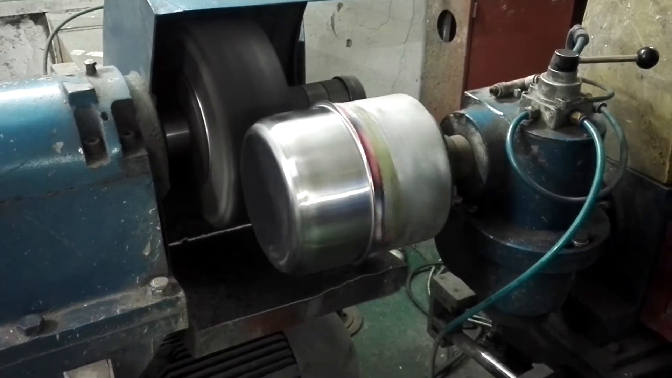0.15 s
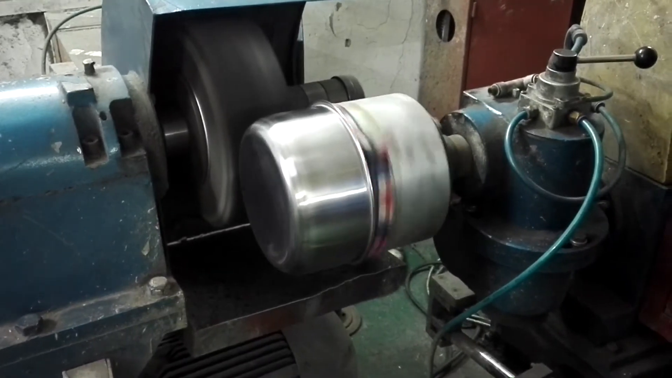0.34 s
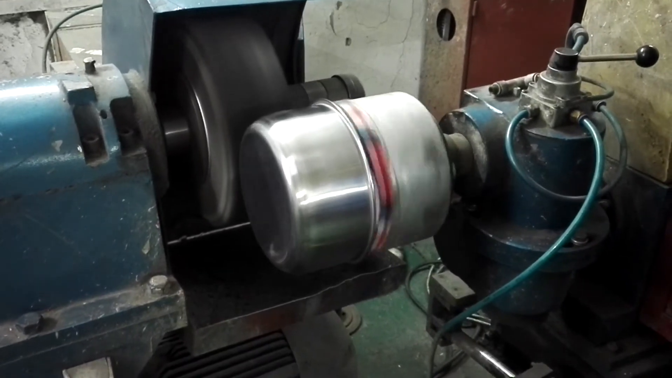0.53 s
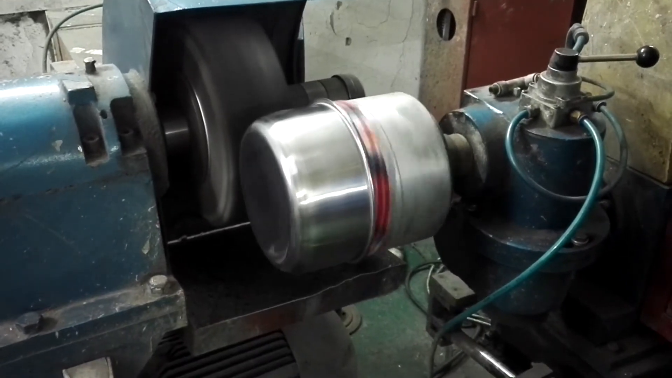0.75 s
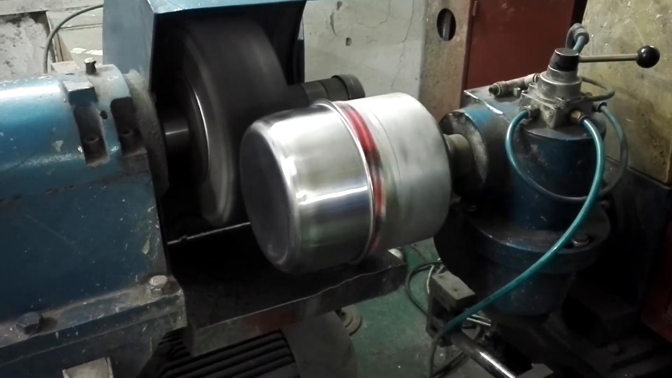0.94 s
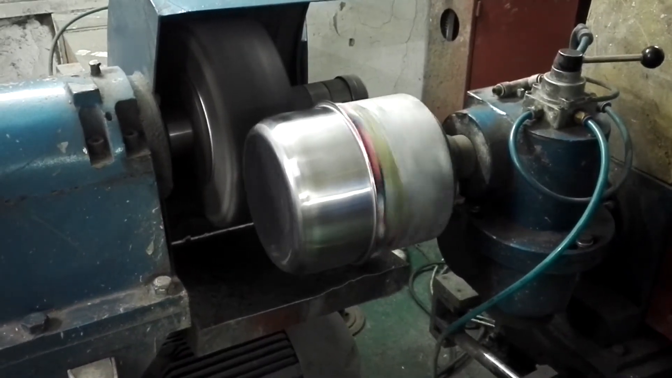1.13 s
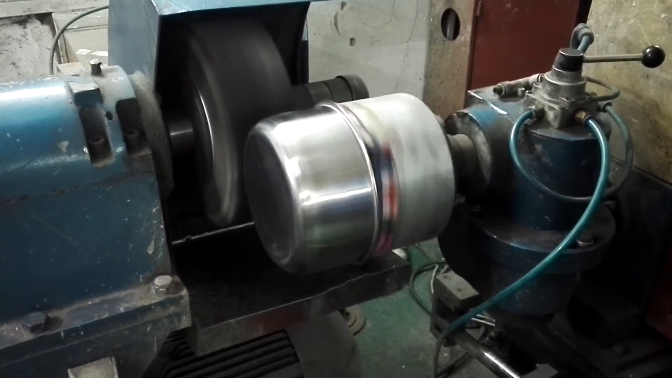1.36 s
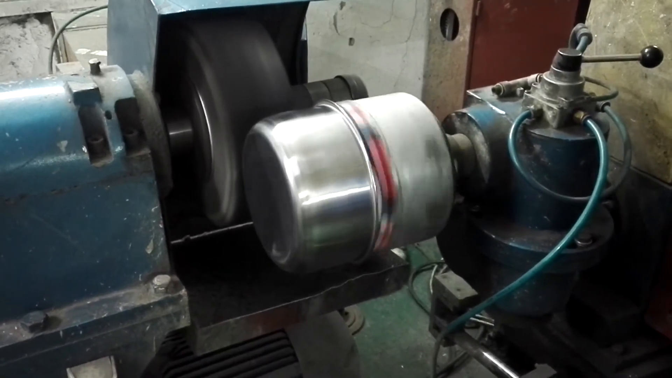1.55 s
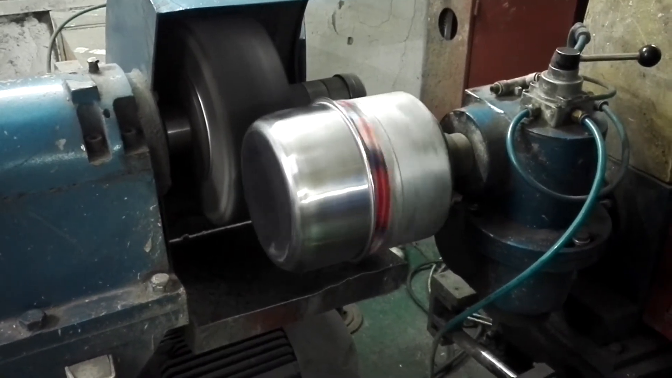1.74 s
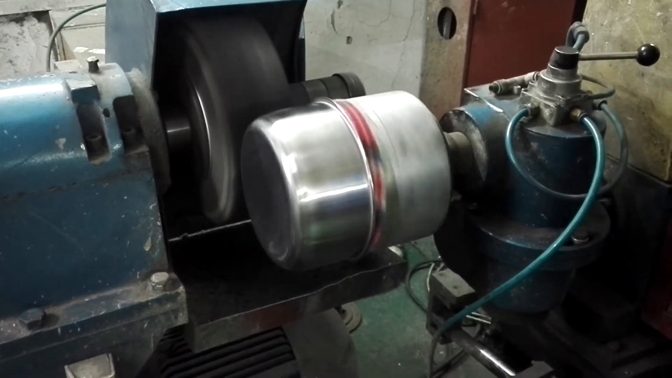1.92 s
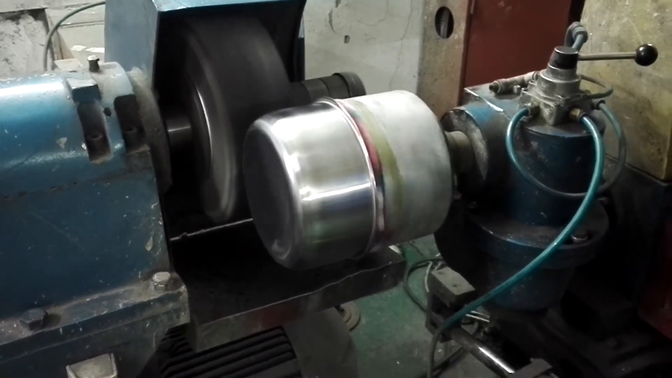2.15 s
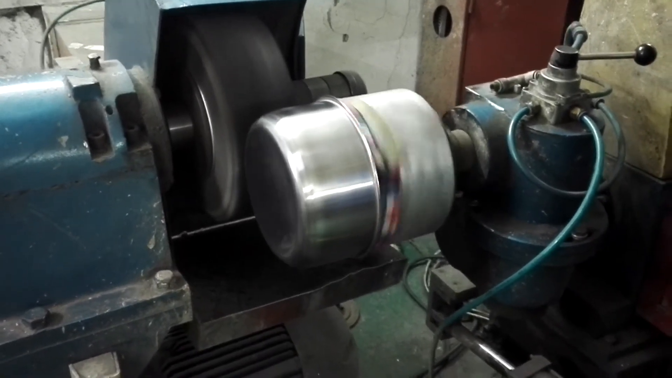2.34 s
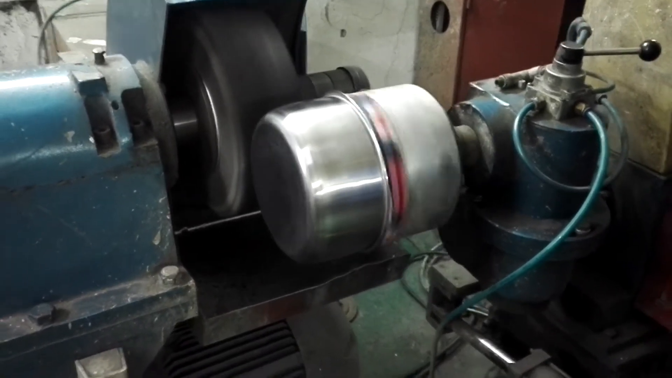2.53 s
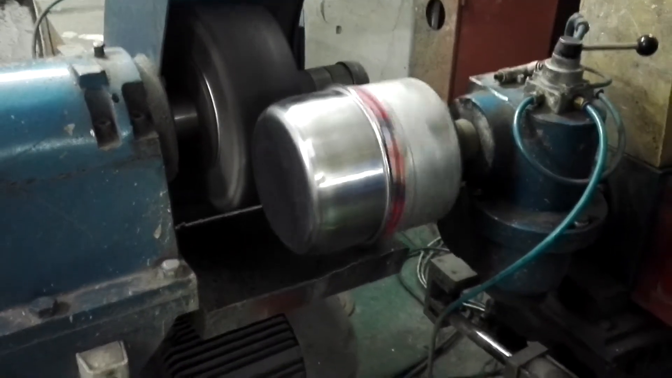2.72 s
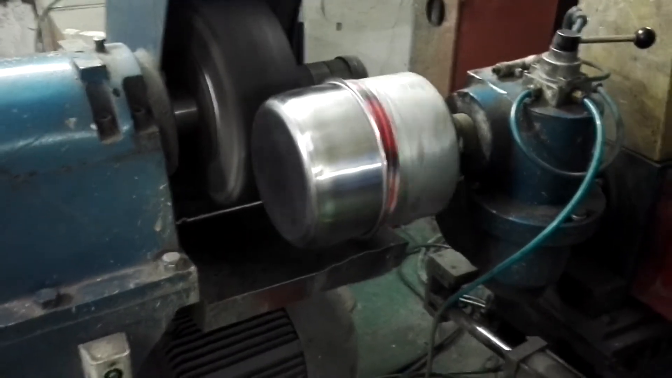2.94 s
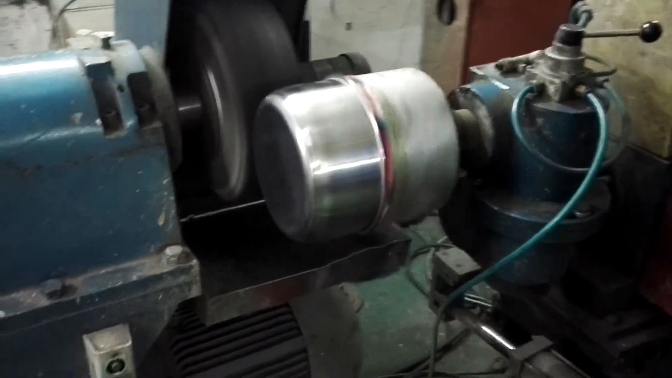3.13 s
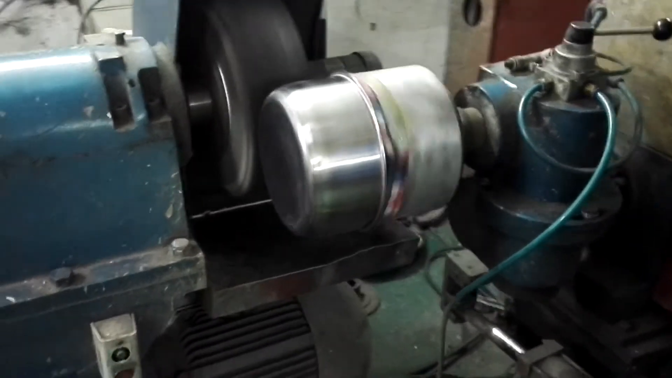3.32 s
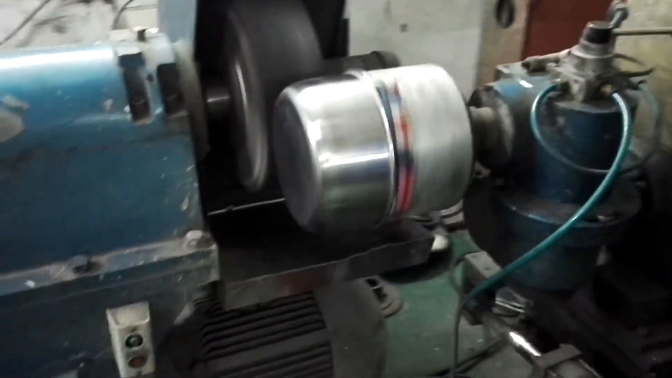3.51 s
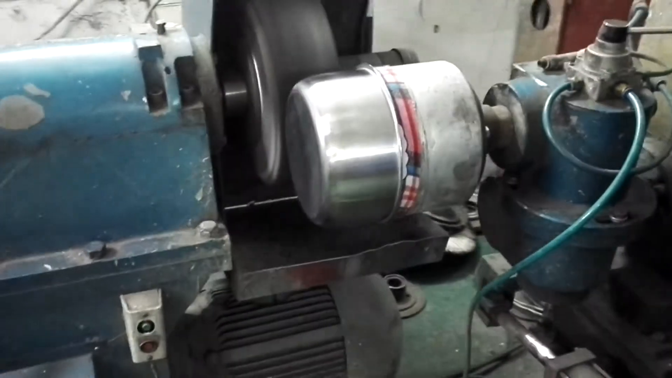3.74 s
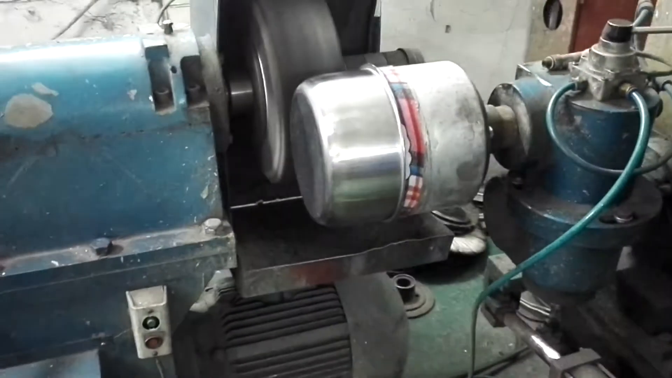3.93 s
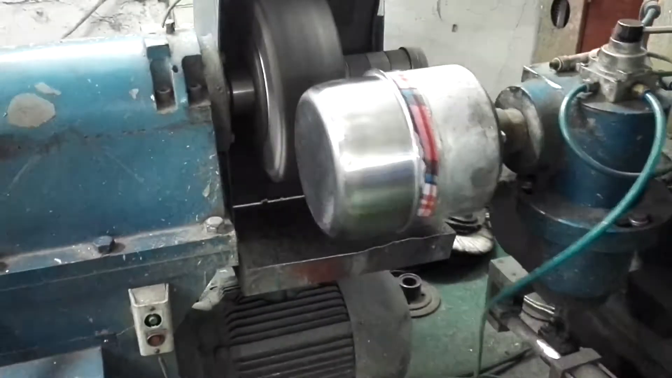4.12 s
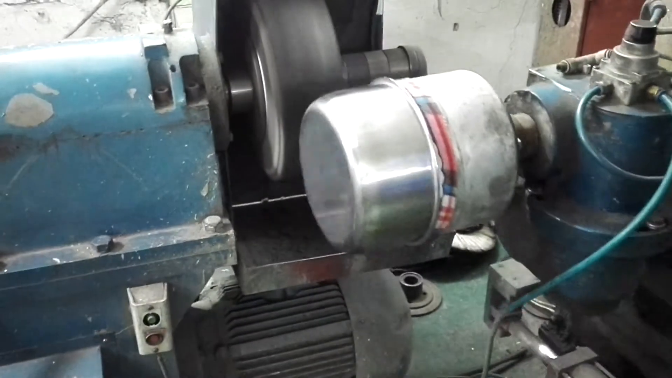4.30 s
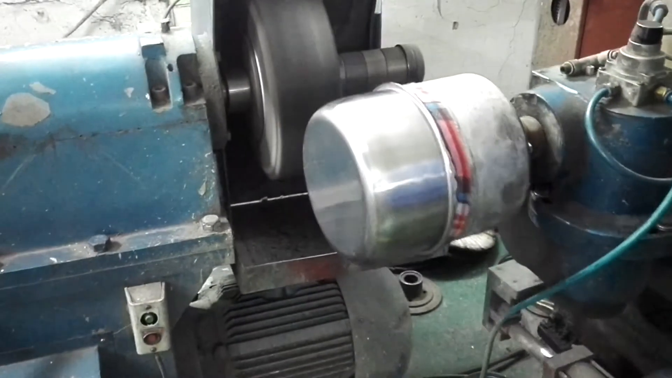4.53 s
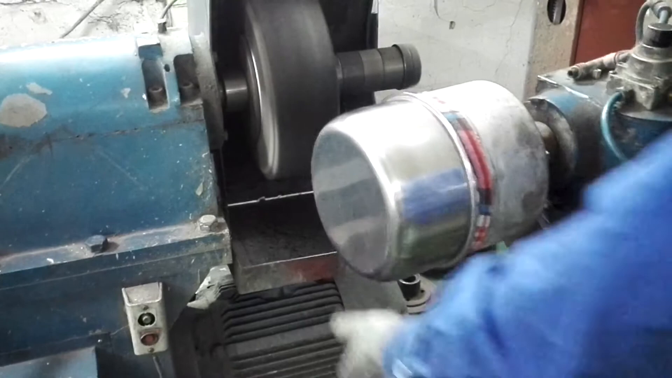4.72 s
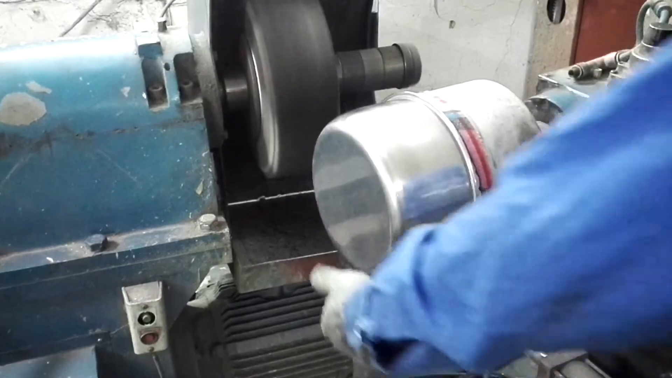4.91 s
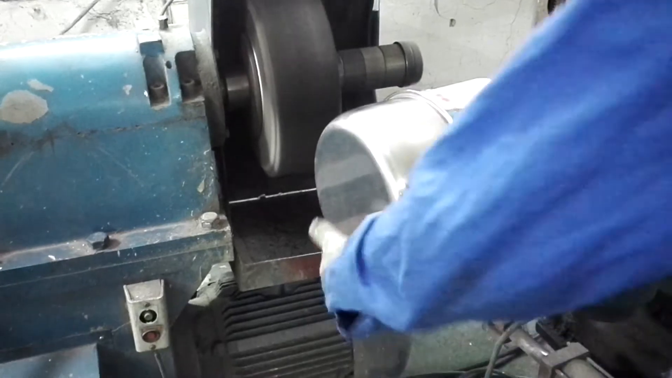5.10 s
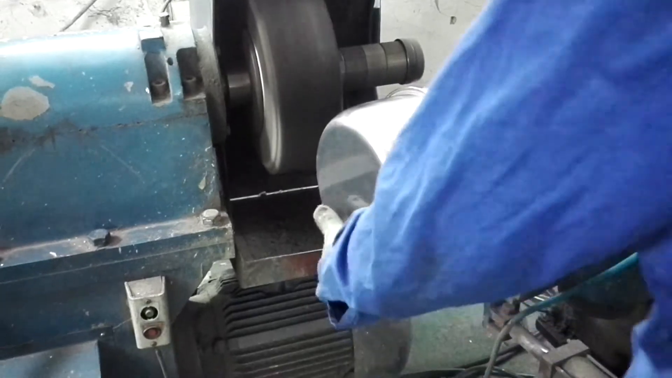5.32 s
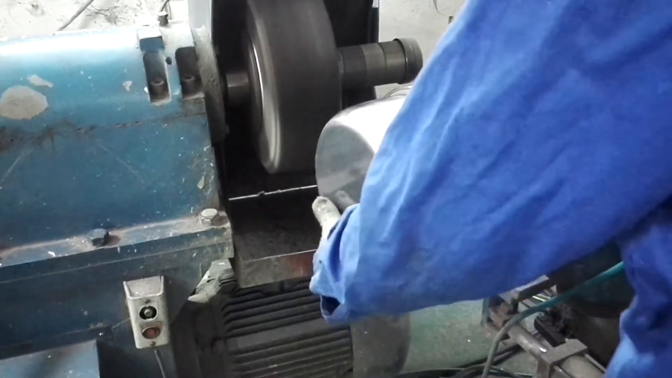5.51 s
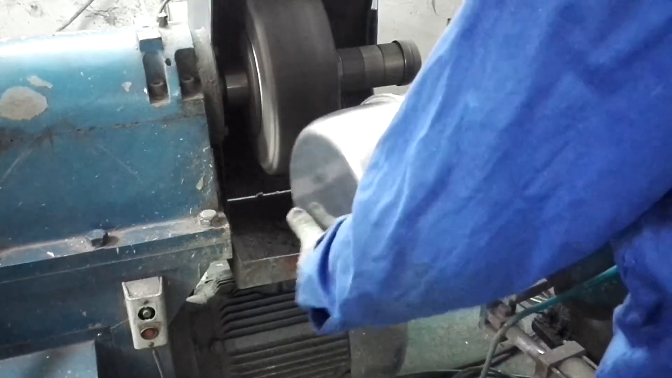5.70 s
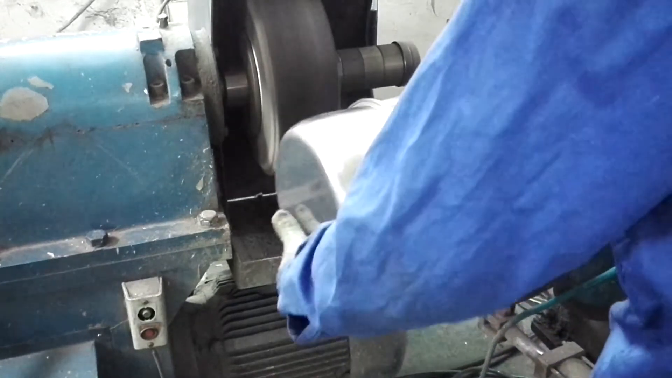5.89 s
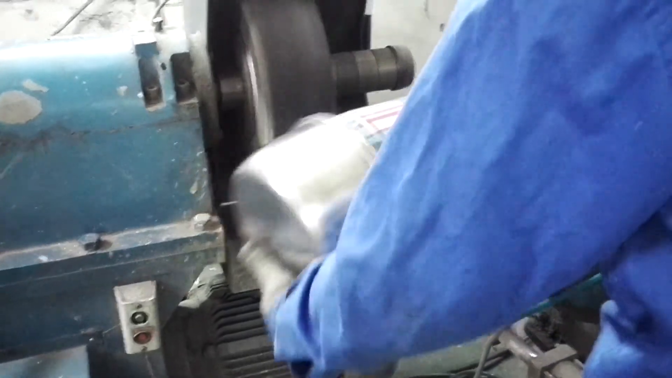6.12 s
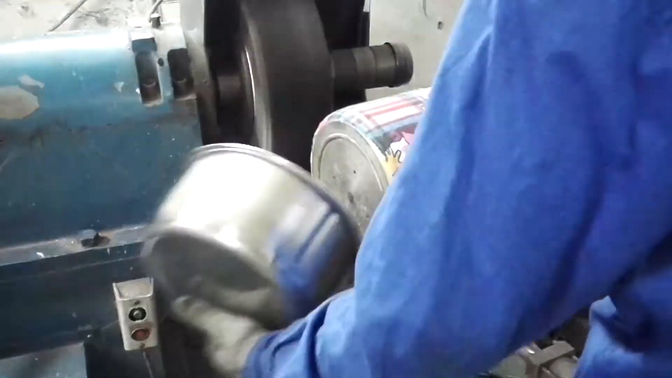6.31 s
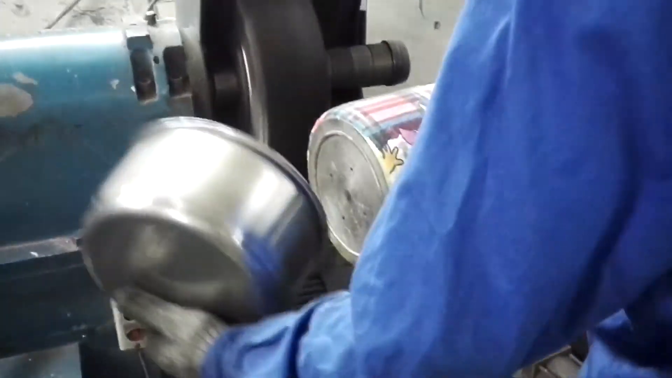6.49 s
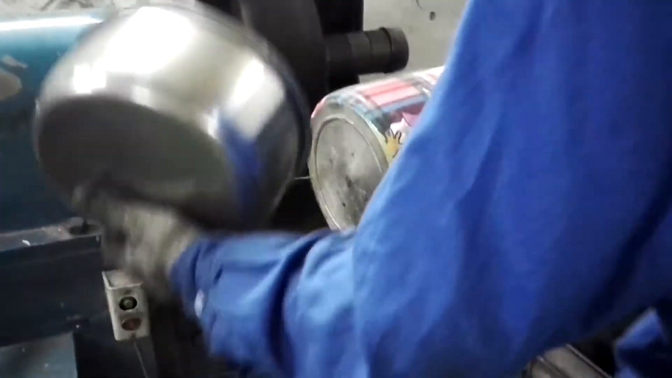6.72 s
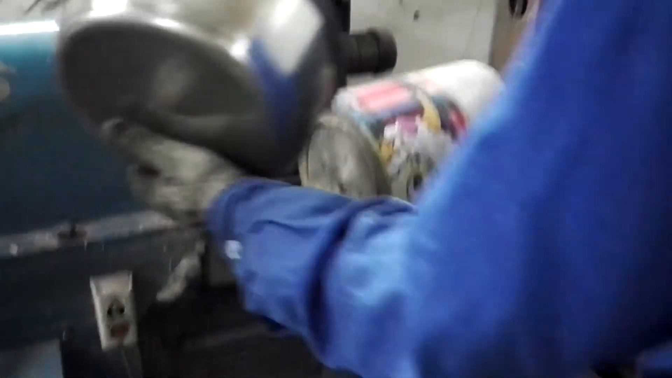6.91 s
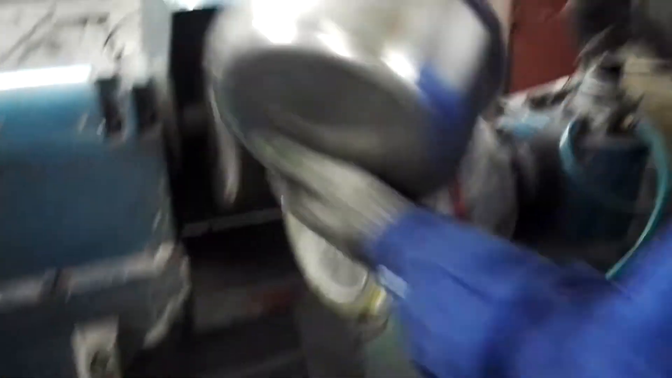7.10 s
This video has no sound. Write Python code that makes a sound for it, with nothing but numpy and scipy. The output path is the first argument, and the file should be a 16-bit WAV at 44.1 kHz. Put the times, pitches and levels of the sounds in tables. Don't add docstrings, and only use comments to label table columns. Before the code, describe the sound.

From 0 to 3 s, a flap wheel grinds a steel pot at close range: dense, bright, gritty hiss over a rough buzz repeating about 37 times a second. The out-of-round pot presses harder roughly once per second, near 0.65, 1.7 and 2.7 s, each time swelling its mid-pitched metallic ring. Soft low gusts buffet mainly the left side, strongest near 0.8 and 1.8 s. At about 2.95 s the wheel lifts and the grinding dies away by 3.7 s, uncovering a thin, high cylinder vent that weakens towards 5 s. At 5.1 s a fuller air burst opens, settles into a steady blow and shuts sharply near 6.1 s. Inside it, at 5.5 s, a gloved push and blow give a short hollow clunk with tiny rocking rattles and brief room echo. Low, slowly beating motor hum, machine rumble and faint leaking air persist to about 7 s.

```python
import sys
import numpy as np
from scipy import signal
from scipy.fft import irfft
from scipy.io import wavfile
from scipy.ndimage import uniform_filter1d

SR = 44100
rng = np.random.default_rng(int(sys.argv[2]) if len(sys.argv) > 2 else 0)


def boost(x):
    u = np.asarray(x, float) / 20
    return 10 ** u


def transcribe(u):
    v = np.clip(np.atleast_2d(u).T, -1, 1)
    q = np.round(v * 32767).astype(np.int16)
    wavfile.write(sys.argv[1], SR, q)


N = 315306

FRAME_S, BIN_HZ = np.arange(N // 256 + 5) * 256 / SR, np.fft.rfftfreq(1024, 1 / SR)
POT_HZ = 0.98
LIFT_S = 2.955
# time_s, turns_per_s
SPEED = [
    (0, 37.073),
    (2.95, 37.073),
    (3.3, 37.37),
    (7.15, 37.37),
]
# pitch_hz, likeness (1 = same)
SAME = [(60, 1), (130, 0.94), (290, 0.98), (630, 0.73), (1380, 0.28), (3030, -0.13), (6650, -0.54),
        (14600, -0.24)]
# time_s, left_over_right_db
AIM = [(0, 3), (2.13, 3), (2.44, -0.5), (3.1, -0.5), (4.5, -1.9), (4.74, 6), (5.2, 4.5), (7.2, 4.5)]


def evened(x):
    return x / np.sqrt(np.mean(x ** 2) + 1e-20)


def read(points, hz):
    f, *columns = np.transpose(points)
    return np.array([np.interp(np.log(hz + 1), np.log(f + 1), c) for c in columns])


def follow(rows, t):
    s, *columns = np.transpose(rows)
    return np.array([np.interp(t, s, c, left=-120, right=-120) for c in columns])


def spread(levels_db, centres, hz):
    place = np.interp(np.log(hz + 1), np.log(centres), np.arange(len(centres)))
    share = np.maximum(1 - abs(place[:, None] - np.arange(len(centres))), 0)
    return share @ levels_db


def hiss(colour, field_db, patchy_db, flicker_db, likeness, pan_db=0, streak_db=1.5):
    a, b, c, d, patches = rng.standard_normal((len(FRAME_S), 513, 5)).T
    streaks = evened(uniform_filter1d(uniform_filter1d(patches, size=3, axis=0), size=40, axis=1))
    streaks = evened(streaks - uniform_filter1d(streaks, size=9, axis=0))
    streaks *= np.clip((9500 - BIN_HZ) / 3000, .3, 1)[:, None]
    patches = evened(uniform_filter1d(uniform_filter1d(patches, size=10, axis=0), size=16, axis=1))
    flicker = evened(uniform_filter1d(rng.standard_normal(len(FRAME_S)), size=6))

    alike, *lead = read(likeness, BIN_HZ)
    same = np.clip(alike, 0, 1)[:, None]
    turned = np.exp(1j * sum(lead, 0 * alike))[:, None]
    left = a + 1j * b
    right = same * turned * left + np.sqrt(1 - same ** 2) * (c + 1j * d)
    z = np.array([left, right])

    z *= evened(boost(read(colour, BIN_HZ)))[:, :, None]
    z *= boost(field_db + patchy_db * patches + streak_db * streaks + flicker_db * flicker)
    treble = np.clip(BIN_HZ / 8000, 0, 1)[:, None]
    z *= boost(np.array([.5, -.5])[:, None, None] * treble * np.clip(pan_db, -9, 9))
    unit = np.sqrt(1024 / 3)
    return signal.istft(z / unit, nperseg=1024, noverlap=768)[1][:, :N]


def wheel_turns():
    drag, lead_s = 0.054, 0.71
    t = np.arange(N) / SR
    turns = np.cumsum(np.interp(t, *np.transpose(SPEED))) / SR
    return turns + drag / (2 * np.pi) * np.cos(2 * np.pi * POT_HZ * (t - lead_s)) * (t < 3)


def contact(t):
    touch_db = [-31, -33, -18.5]
    bulge_db = [5, 1.04, 0.37]
    lift_db = [-5, 0, -2.5]
    fade_db_per_s = [39, 34.5, 27]
    rise, hold, fall = 0.13, 0.23, 0.25
    angle = ((t - 0.649) * POT_HZ) % 1
    corners = np.cumsum([0, rise, hold, fall])
    bulge = np.interp(np.where(t < LIFT_S, angle, rise), corners, [0, 1, 1 - 0.26, 0])
    since = np.maximum(t - LIFT_S, 0)
    lift = np.outer(lift_db, np.minimum(since / 0.057, 1)) - np.outer(fade_db_per_s, since)
    pressed = np.c_[touch_db] + np.outer(bulge_db, bulge) + lift
    return np.where(since < 0.75, pressed, -120)


def flaps(turns):
    # multiple_of_wheel_turn, level_db
    strong_orders = [(5, -17), (6, -5), (7, -10.5), (9, -6), (10, -9.5), (11, -4), (13, -6), (15, -7),
                     (16, -3), (17, -0.5), (18, -9.5), (19, 3.5), (20, 1.5), (21, 0), (22, -6), (23, -7),
                     (24, -5), (26, 1), (27, -8), (29, -1), (34, -6), (35, -2), (37, -5.5), (38, -18),
                     (39, 1), (40, -1), (43, -3.5), (54, -10), (55, -1), (63, -1.5)]
    # pitch_hz, level_db
    lesser = [(37, -30), (150, -21), (300, -22), (500, -15), (1100, -15), (1800, -15), (2100, -14),
              (2400, -7), (3000, -8), (3800, -6), (4500, -10), (5500, -11), (6500, -15), (8000, -26)]
    ring_hz = [590, 740, 1000]
    level_db, sway_db, scatter_db = -8.0, 1.0, 7.0
    wander, apart = 0.2, 0.024
    order, count = np.arange(216), 140
    hz = order * SPEED[0][1]
    t = np.arange(count) / SPEED[0][1]
    phase, skew, scatter, tilt, sway = rng.standard_normal((len(order), 5)).T

    order_db = read(lesser, hz)[0] + scatter_db * np.minimum(scatter, .4)
    order_db -= 99 * np.isin(order, [0, 3])
    strong, strong_db = np.transpose(strong_orders)
    order_db[np.round(strong).astype(int)] = strong_db

    pressure_db = spread(contact(t)[[1, 0, 1]] + [[2.0], [0.0], [2.0]], ring_hz, hz)
    pressure_db -= 11.5 * np.maximum(t - LIFT_S, 0)
    pressure_db += sway_db * np.cos(2 * np.pi * POT_HZ * t + 9 * sway[:, None])

    re, im = uniform_filter1d(rng.standard_normal((count, len(order), 2, 2)), size=5, axis=0).T
    sides = np.array([[1], [-1]]) * np.minimum(apart * order, 2) * (0.27 * tilt + 1j * skew) / 2
    z = np.exp(9j * phase + sides)[:, :, None]
    z = z * (1 + wander * evened(re) + wander * 1j * evened(im))
    waves = irfft(z * boost(order_db[:, None] + pressure_db + level_db), n=4096, axis=1) * 2048

    whole = np.clip(turns, 0, count - 2).astype(int)
    part = turns % 1
    at = part * 4096
    step = at.astype(int)

    def blended(k):
        return (1 - part) * waves[:, k % 4096, whole] + part * waves[:, k % 4096, whole + 1]

    here = blended(step)
    return here + (at - step) * (blended(step + 1) - here)


def grit():
    # pitch_hz, left_db, right_db
    colour = [(30, -55, -52), (80, -31, -29), (195, -31, -20), (400, -18, -25.5), (760, -10.5, -32),
              (1150, -17.5, -8.5), (1410, -18, -7), (1780, -8, -13), (2680, -6.5, -4.5), (6300, -8.5, -9),
              (9300, -8, -13), (10100, -5.5, -8.5), (13100, -7, -14.5), (14400, -14, -24)]
    contact_hz = [800, 3500, 11000]
    # pitch_hz, likeness
    same_near = [(60, 0.23), (130, -0.13), (290, 1), (630, -1.4), (1380, -0.38), (3030, 0.43),
                 (6650, -0.18), (14600, -0.87)]
    field_db = spread(contact(FRAME_S) + [[10.0], [5.0], [4.0]], contact_hz, BIN_HZ)
    pan_db = follow(AIM, FRAME_S)[0] - 3.5
    return hiss(colour, field_db, 1.0, 0.6, same_near, pan_db, streak_db=2.8)


def vent():
    # pitch_hz, left_db, right_db
    colour = [(700, -28.5, -33.5), (1500, -26, -26.5), (2320, -25, -21.5), (3350, -25, -18),
              (5370, -28.5, -16), (6500, -19, -10), (8350, -11.5, -11), (9400, -8.5, -9), (10200, -1.5, -6),
              (11000, -11, 1), (11900, -2.5, -1), (12400, 0, -11), (13400, -5.5, -7), (14200, -9, -23.5)]
    # time_s, level_db
    jet = [(2.6, -60), (3.15, -29), (3.64, -28), (3.98, -29), (4.46, -27), (4.74, -32), (5.01, -38),
           (5.09, -46.5), (5.16, -43)]
    # pitch_hz, likeness, right_lead_radians
    vent_same = [(4000, .15, 3), (7500, .2, -1.5), (9300, .3, .2), (10500, .45, 2.3), (11400, .5, .6),
                 (12100, .55, 1.9), (13400, .5, 3.1), (14200, .35, 3.5)]
    jet_db = follow(jet, FRAME_S)[0]
    low_db = -38 + 0.15 * (jet_db + 29) - 1.1 * (FRAME_S - LIFT_S)
    levels_db = np.array([np.minimum(low_db, jet_db) + 14.0, jet_db + 3.0])
    field_db = spread(levels_db, [3500, 10000], BIN_HZ)
    return hiss(colour, field_db, 1.0, 0.85, vent_same, follow(AIM, FRAME_S)[0], streak_db=1.65)


def chuck():
    # pitch_hz, left_db, right_db
    colour = [(400, -27, -14), (794, -8, -10.5), (1230, -9, -9.5), (1550, -2, -3), (2000, -4.5, -1),
              (2500, -4, -1.5), (3580, -9.5, -5), (4600, -10, -4.5), (6500, -6.5, -7), (8700, -1.5, -6.5),
              (10000, -1, -4), (11700, -1.5, -2), (13000, 1, -6), (14200, -7, -12)]
    open_s, shut_s, low_lead_s = 5.1, 6.15, 0.084
    since = np.maximum(FRAME_S - open_s, 0)
    held_db = -39.5 + 9 * np.exp(-since / 0.097) - 1.2 * since
    held_db += 20 * np.log10(np.clip(since / 0.093, 1e-5, 1))
    fall = 103
    low_db = held_db - fall * np.maximum(FRAME_S - shut_s + low_lead_s, 0)
    low_db += 2.5 - 4.5 * np.exp(-since / 0.26)
    jet_db = held_db - fall * np.maximum(FRAME_S - shut_s, 0) + 2.0
    field_db = spread(np.array([low_db, jet_db]), [2500, 8000], BIN_HZ)
    return hiss(colour, field_db, 0.68, 0.28, SAME)


def knocks():
    # start_s, level_db, hardness (0-2), rise_s
    blows = [
        (5.495, -29, 0, 0.0047),
        (5.503, -26.5, 1.14, 0.0023),
        (5.518, -33.5, 1.8, 0.0057),
        (5.542, -31, 1.92, 0.015),
        (5.62, -42, 1.9, 0.014),
    ]
    # pitch_hz, level_db, time_to_fall_60_db_s
    modes = [(214, 4.5, 0.097), (305, -9, 0.24), (530, -7.5, 0.22), (610, 10, 0.037), (643, 7, 0.19),
             (680, -3.5, 0.24), (900, 5.5, 0.042), (885, -12, .15), (1400, -5, 0.47), (1920, -13, .3)]
    t, out = np.arange(SR // 2) / SR, np.zeros(N + SR)
    for s, db, hard, rise in blows:
        ring = np.zeros(len(t))
        for hz, mode_db, t60 in modes:
            softness_db = 7.2 * (2 - hard) * np.log2(hz / 200)
            ring += boost(mode_db - 60 * t / t60 - softness_db) * np.sin(2 * np.pi * hz * t)
        out[round(s * SR):][:len(t)] += boost(db - 3.5) * ring * np.minimum(t / rise, 1)
    taps = rng.standard_normal((SR // 2, 2)).T * boost(-60 * t / 0.4) * (t > .012)
    wet = signal.fftconvolve(out[None], taps / np.linalg.norm(taps[0]), axes=1)
    return out[:N] + boost(-11.5) * wet[:, :N]


def draught():
    # peak_s, level_db
    gusts = [(.08, -57), (.44, -52), (.64, -52), (.8, -43), (1.03, -52), (1.26, -57), (1.55, -64),
             (1.78, -46), (2.05, -56), (2.8, -72), (3.05, -73)]
    rise, fall = 110, 60
    band = signal.butter(2, [18, 70], "band", fs=SR, output="sos")
    puffs = signal.sosfilt(band, rng.standard_normal((2, N)))
    s, top_db = np.transpose(gusts)
    late = FRAME_S[:, None] - s
    level_db = (top_db - np.maximum(fall * late, -rise * late)).max(axis=1)
    return evened(puffs) * boost(np.interp(np.arange(N) / SR, FRAME_S, level_db) + [[3.0], [-9.0]])


def hum(turns):
    belt = 3.063
    t = np.arange(N) / SR
    slip = 2 * np.pi * (belt - 3) * turns
    motor = 2 * np.pi * belt * turns
    free = np.clip((t - 3.05) / .25, 0, 1)
    loaded = boost(-55.5) * (1 - free) * np.cos(motor - slip + slip[round(1.66 * SR)])
    idle = boost(-59.5) * free * np.cos(motor - slip + slip[round(5.17 * SR)])
    return np.sqrt(2) * (boost(-54.5 + 1.1 * free) * np.cos(motor) - loaded - idle)


def shop():
    # pitch_hz, left_db, right_db
    colour = [(30, -26, -35), (70, -6.5, -6), (233, 0.5, 1), (407, -7, -5.5), (730, -7.5, -7),
              (1040, -16.5, -15), (1390, -10, -10), (2130, -16.5, -13.5), (3470, -22.5, -16),
              (5840, -13, -12.5), (8550, -12, -15), (9800, -4.5, -9), (12700, -6, -15), (14400, -8, -20)]
    lumps = evened(uniform_filter1d(rng.standard_normal(len(FRAME_S)), size=14))
    field_db = -44 - 0.2 + 0.5 * lumps * (BIN_HZ < 500)[:, None]
    return hiss(colour, field_db, 0.89, 0.13, SAME)


def scene():
    turns = wheel_turns()
    grinding = flaps(turns) + grit()
    air = vent() + chuck()
    background = draught() + hum(turns) + shop()
    return grinding + air + knocks() + background


def band_limit(x):
    return signal.sosfilt(signal.butter(12, 14740, fs=SR, output="sos"), x)


def record(dry):
    edge = signal.firwin(511, 14340, window=("kaiser", 9), fs=SR)
    mix = signal.oaconvolve(dry, edge[None], "same")
    return band_limit(mix)


dry = scene()
out = record(dry)
transcribe(out)
```